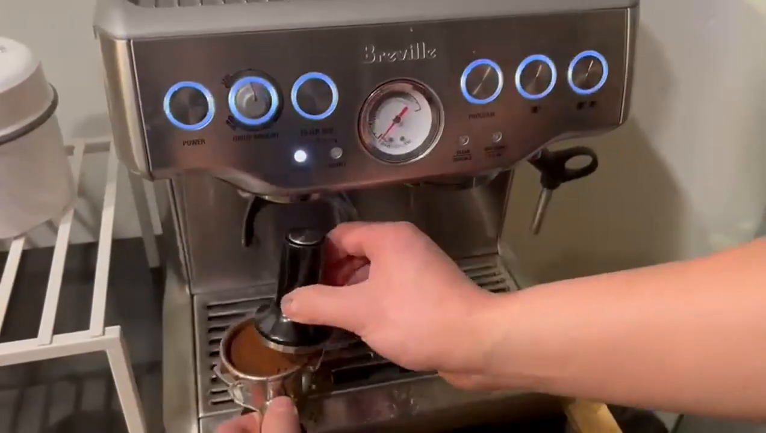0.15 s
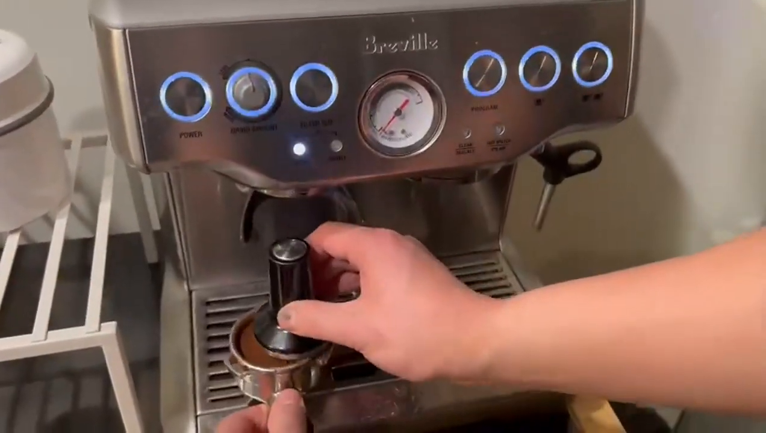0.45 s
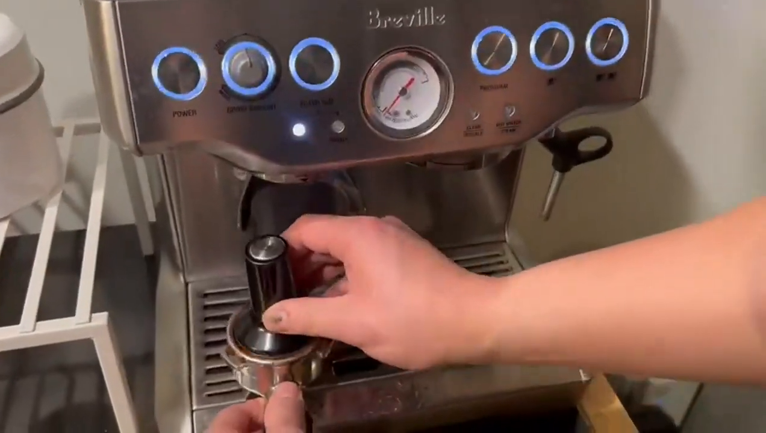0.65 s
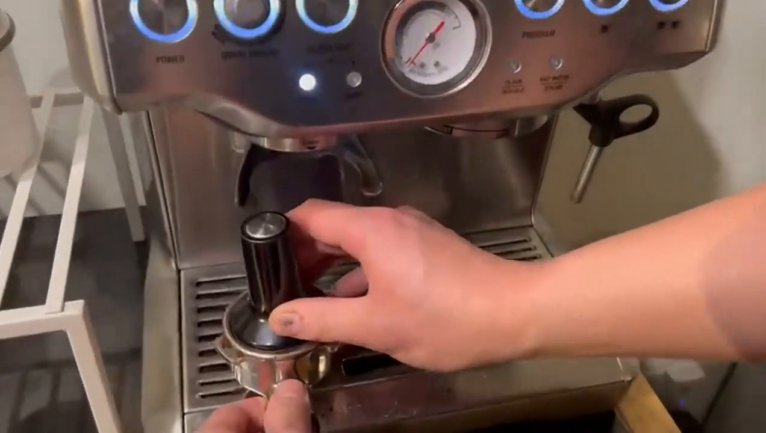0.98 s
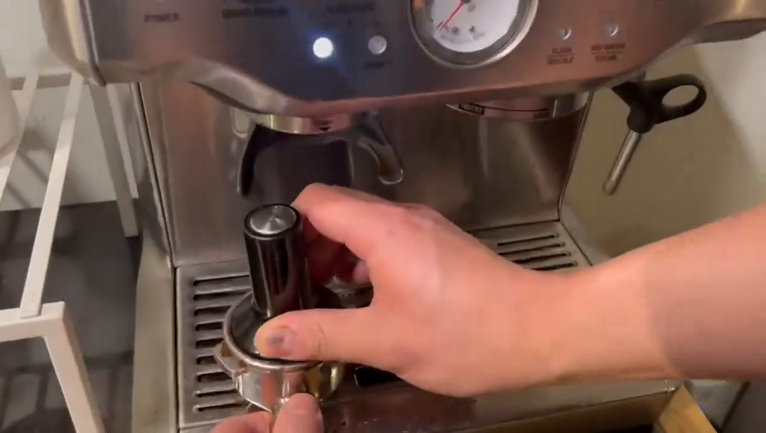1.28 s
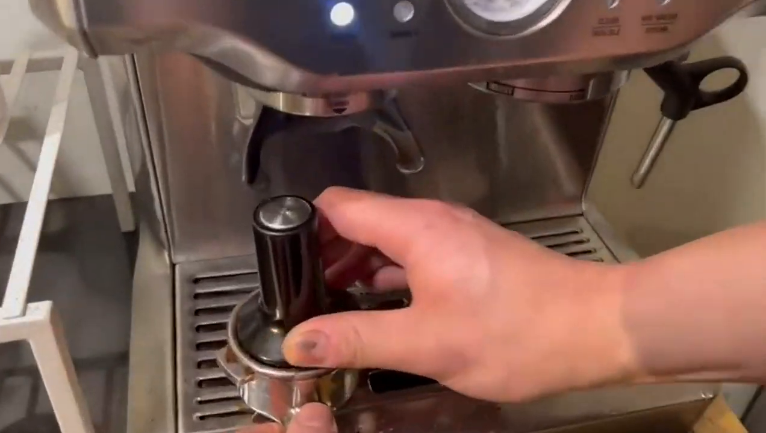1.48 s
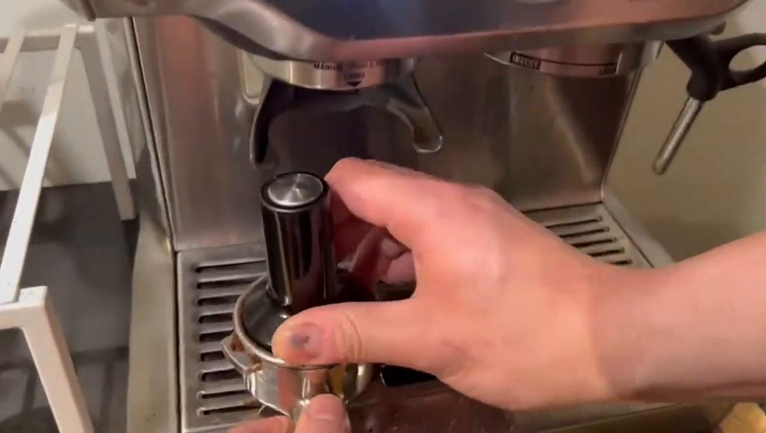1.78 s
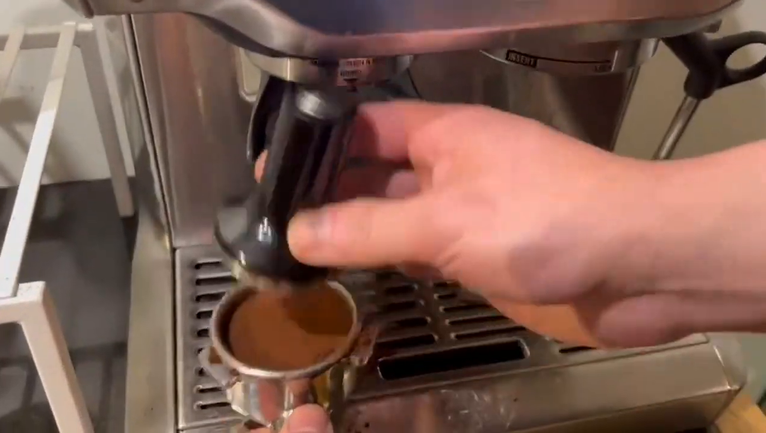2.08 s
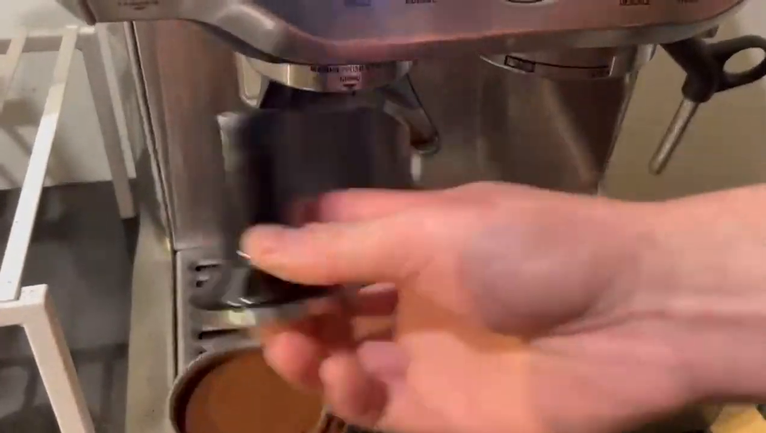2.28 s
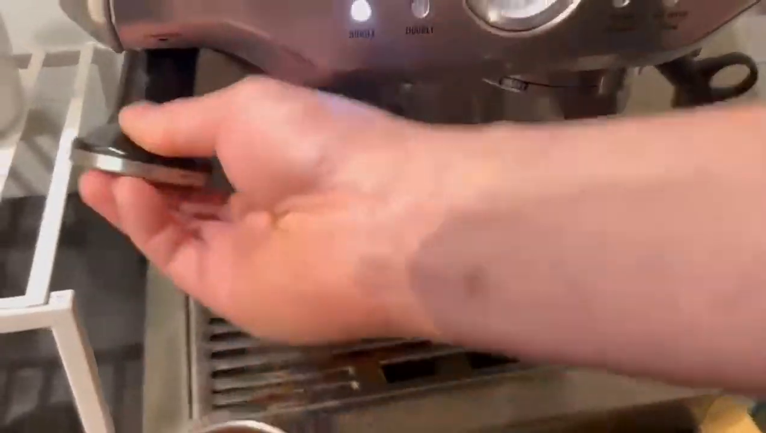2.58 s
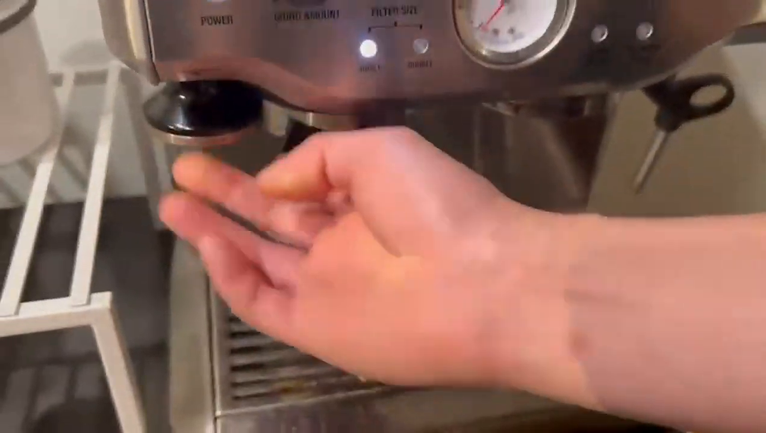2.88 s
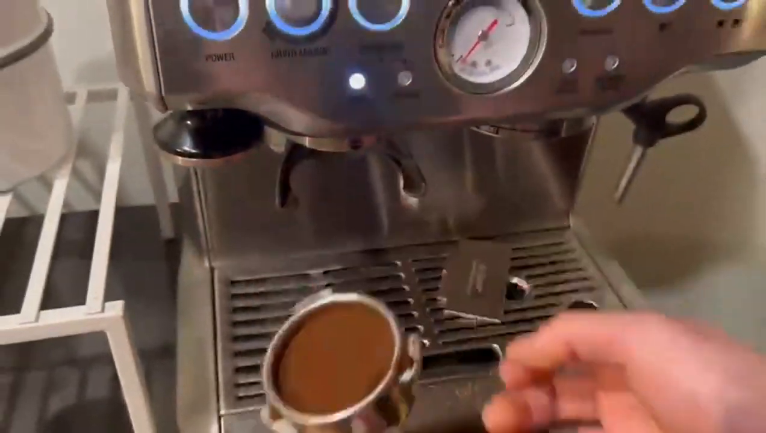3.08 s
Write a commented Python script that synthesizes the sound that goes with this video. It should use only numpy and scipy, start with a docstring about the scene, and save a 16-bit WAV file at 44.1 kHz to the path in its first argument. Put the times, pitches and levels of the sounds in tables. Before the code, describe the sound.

Metal tamper on a coffee machine: one clear early tap, soft clicks and gritty rubbing, a sharp panel knock, then a cluster of loud clacks as it seats in the housing; close up, quiet kitchen.

```python
"""A metal tamper is tapped, pressed and twisted in a coffee filter handle on a drip tray, lifted against
the machine's front panel, then slid into its holder in the housing, where it rattles and snaps home.
Each contact is a short noisy force that rings clear modes and dense sheet-metal modes; rubbing is gritty
noise on level curves, and thumps through the counter are damped swings. The kitchen behind has a low hum
and faint air noise. All is picked up from close by with two microphone ports."""
import sys
import numpy as np
from scipy import signal
from scipy.fft import rfft, irfft
from scipy.io import wavfile
from scipy.ndimage import uniform_filter1d

SR = 44100
rng = np.random.default_rng(int(sys.argv[2]) if len(sys.argv) > 2 else 0)


def store_pcm(level_fs):
    """Save levels as 16-bit WAV."""
    pcm = np.round(np.clip(level_fs, -1, 1) * 32767).astype(np.int16)
    wavfile.write(sys.argv[1], SR, np.atleast_2d(pcm).T)


N = 143325  # samples

STRIKE_DB = 5  # sharp blow at the head of a tap or knock, over its chatter

# Tamper on basket and tray: start_s, level_db (see contacts), then five band levels above it:
# bass_db, low_db, mid_db, high_db, treble_db; left_minus_right_db, build_up_s, contact_fade_s
# (before each band's share), ring_share (of the decay times), clear_modes_db
TAP_CONTACTS = [(0.027, -46, -28, -44, -12.5, -17.5, -17, 1, 0.00034, 0.012, 0.51, 2),
                (0.282, -61.5, -36, 7, 0, -19, -23, -5, 0.002, 0.015, 0.5, -10),
                (0.31, -24, -22, -9.5, -16, -17.5, -20.5, -1.5, 0.0012, 0.011, 0.91, 1),
                (0.494, -40, -10.5, 0, -9.5, -23.5, -22, -3, 0.0009, 0.0015, 0.63, 3),
                (0.515, -50.5, -30, -1, -11, -35, -20, -8, 0.00065, 0.002, 0.41, 18),
                (0.776, -49, 2.5, -6, -33, -53, -46, -2, 0.0018, 0.0017, 0.67, 12),
                (0.849, -69, -6, -15, 0, -23, -37, -6, 0.0004, 0.006, 0.4, 6),
                (1.0, -29.5, -12, -24, -21, -19.5, -10.5, -1.5, 0.00042, 0.0074, 0.43, 0),
                (1.012, -33, -33, -6, -14, -15, -8.5, 0, 0.0019, 0.0044, 0.49, 7),
                (1.996, -61.5, 9, -5, 9, 7.5, -24, -5, 0.00036, 0.0026, 0.31, 4),
                (2.074, -34, -10, -46, -6, -17, -58, -0.5, 0.00019, 0.0027, 1, -2.5),
                (2.309, -48, -22, -4, 3, -12, -26, 3, 0.00051, 0.012, 0.85, -6)]
# Clear modes of the tray: pitch_hz, level_db, t60_s
TRAY_MODES = [(173, -6.5, 0.13), (274, 0.5, 0.024), (329, -5.5, 0.044), (466, 5.5, 0.081),
              (560.5, 3.5, 0.047), (1120, -7.5, 0.09), (1428, -2, 0.034), (2000, -27, 0.048),
              (2475, -9, 0.071), (2830, -25, .12), (2840, -20, 0.076), (3635, -7.5, 0.027),
              (7400, -8, 0.05), (7800, -8, 0.11), (8020, -10, 0.06), (7700, -9, 0.069)]


def taps():
    """Impact excitation: a sharp blow with chatter sets the tray's modes ringing."""
    return contacts(TAP_CONTACTS, TRAY_MODES, undb(STRIKE_DB))


# Lifted tamper on the front panel: columns of TAP_CONTACTS
PANEL_CONTACTS = [(2.181, -7, -19.5, -11, -17, -14.5, -21.5, -2.7, 0.00062, 0.0014, 0.6, 3.2)]
# Clear modes of the front panel: pitch_hz, level_db, t60_s
PANEL_MODES = [(287, -4.5, 0.13), (375, -12.5, 0.33), (482, -12, 0.16), (556, -1.5, 0.11),
               (606, 4.5, 0.081), (720, -23, 0.055), (1060, -8, 0.066), (1192, 2, 0.031),
               (1350, -14, 0.057), (1940, -8, .06), (2320, -3, 0.051), (2460, 2.5, 0.04),
               (2790, -16, 0.036), (3530, -25.5, .06)]


def panel_knock():
    """Plate resonance: the same kind of blow rings the panel's own set of modes."""
    return contacts(PANEL_CONTACTS, PANEL_MODES, undb(STRIKE_DB))


# Tamper in its holder: columns of TAP_CONTACTS
HOLDER_CONTACTS = [(2.457, -17, -12, -4, -8.5, -15.5, -17.5, -1.5, 0.0014, 0.0028, 0.88, -9),
                   (2.468, -27, -36, -10, -1.5, -13, -20, -1.3, 0.00082, 0.022, 1, -2.4),
                   (2.502, -20, -9.5, -4, 2, -16.5, -14.5, 0.24, 0.00084, 0.0017, 1, -1.5),
                   (2.553, -4.5, -29.5, -15.5, -11, -37, -21, 1.6, 0.00042, 0.0037, 0.43, -10),
                   (2.555, -19.5, -32, -4, 2.5, -33, -15.5, -0.77, 0.00085, 0.0044, 0.15, 3.5),
                   (2.729, -41, -4, -27, -1, -20.5, -27.5, 0.0, 0.0033, 0.0017, 0.89, 6),
                   (2.771, -2, -23, -9.5, -9, -16, -19.5, 0.35, 0.0023, 0.0037, 0.58, 3.5),
                   (2.81, -34, -12.5, -9, -9.5, -5.5, -29, 0, 0.0007, 0.002, 0.4, -1),
                   (2.987, -42.5, -37.5, -14, -12, -7, -46, 0.32, 0.00059, 0.014, 1, 4),
                   (3.081, -46, -10.5, -1.5, -1, -24, -41, 0.5, 0.00057, 0.0028, 0.86, 2),
                   (3.122, -32.5, -21.5, -13, -12, -21, -53.5, -0.0093, 0.0054, 0.0039, 1, -2.5)]
# Clear modes of the housing: pitch_hz, level_db, t60_s
HOUSING_MODES = [(276.5, 3, 0.17), (373, -5, 0.15), (484, -9, 0.098), (603, -6.5, 0.22), (788, -5.5, 0.19),
                 (853, 8, 0.025), (921, 2.5, 0.062), (1061, -9.5, 0.078), (1282, -8, 0.17),
                 (1379, -6.5, 0.18), (1600, -10, 0.099), (2414, 0, 0.046), (2670, 0, 0.04),
                 (3370, -8, 0.033), (3760, 1, 0.035)]


def holder_knocks():
    """Repeated impact: a series of blows, each ringing the housing's modes afresh."""
    return contacts(HOLDER_CONTACTS, HOUSING_MODES, undb(STRIKE_DB))


# Short scuffs of metal on metal, the last two in the holder: columns of TAP_CONTACTS
SCUFF_CONTACTS = [(0.684, -41.5, -14.5, -5.5, -15.5, -22.5, -34, -0.5, 0.0053, 0.018, 0.54, 2),
                  (0.697, -43, -14, -1.5, -8.5, -18.5, -35, -1, 0.0012, 0.0091, 0.31, 10),
                  (0.71, -54, -18, -22, -22, -15, -23, -2, 0.00091, 0.011, 0.46, -9),
                  (1.62, -42, -13, -28, -6.5, -9, -49, 0.5, 0.0021, 0.013, 0.51, -5.5),
                  (1.637, -32.5, -17.5, -13.5, -17, -26.5, -51, -2, 0.0011, 0.022, 0.38, 5.5),
                  (1.715, -29.5, -20.5, -11.5, -15.5, -22, -34, -0.5, 0.00043, 0.023, 0.37, 2),
                  (1.893, -40.5, -14, -15.5, -14.5, -9, -14, -4, 0.005, 0.019, 0.14, -8),
                  (1.961, -41.5, -11.5, -18.5, -7.5, -23, -39, 4, 0.00074, 0.032, 0.32, 3),
                  (2.533, -11.5, -18.5, -26, -13.5, -17.5, -28, -0.5, 0.0024, 0.01, 0.27, -1),
                  (2.674, -28, -42, -12.5, -11.5, -14, -18, 0, 0.0013, 0.01, 0.28, -8)]


def scuffs():
    """Frictional excitation: chatter without a sharp blow rings tray or housing."""
    return contacts(SCUFF_CONTACTS[:-2], TRAY_MODES) + contacts(SCUFF_CONTACTS[-2:], HOUSING_MODES)


# Sliding contacts, the first on the basket, the rest in the holder: columns of TAP_CONTACTS
SLIDE_CONTACTS = [(1, -40.5, -7.5, -1.5, -8.5, -17, -24, 0.013, 0.01, 0.0028, 0.82, -5),
                  (2.549, -18.5, -8.5, -5.5, -7.5, -6.5, -9.5, 0.0055, 0.0028, 0.00095, 0.56, -4),
                  (2.75, -35.5, -21, -13, 7, -0.5, -38.5, 0.0012, .001, 0.019, 1, -2.5),
                  (2.767, -20, -8, -11.5, 1, -23, -13, 0.003, 0.0036, 0.00075, 0.41, -6)]


def slides():
    """Frictional excitation: chatter builds up to each contact, quickly or slowly, then fades."""
    return contacts(SLIDE_CONTACTS[:1], TRAY_MODES) + contacts(SLIDE_CONTACTS[1:], HOUSING_MODES)


# Frequency bands of the contacts and the room: low_edge_hz, high_edge_hz
BANDS_HZ = [(130, 330), (330, 800), (800, 2000), (2000, 5000), (5000, 11500)]
# Many small modes of sheet metal, one row per band: level_db, t60_s (before ring_share),
# fade_share (of contact_fade_s), likeness_left_right (0 to 1)
SHEET_MODES = [(0, 0.54, 1.78, 1), (0, 0.27, 1.23, 0.8), (3, 0.12, 1.47, 0.49), (6, 0.042, 1.75, 0.8),
               (6, 0.017, 1.02, 0.77)]
CHATTER_DB, SCATTER_DB, PITCH_SCATTER = 2, 2, 0.006  # grain unevenness; mode level and relative pitch spread


def contacts(rows, modes, strike=0):
    """Modal synthesis: each force, building up and fading, drives clear modes and a diffuse sheet ring."""
    out, lead = np.zeros((2, N)), SR // 25
    t = np.arange(SR // 4) / SR
    from_contact = t - lead / SR
    mode_hz, mode_db, mode_t60 = np.array(modes).T[:, :, None]
    for start, level_db, *bands_db, pan_db, rise, fade, ring_share, clear_db in rows:
        grit = gritty(len(t), CHATTER_DB)
        pitch_chance, level_chance = rng.standard_normal((2, len(mode_hz), 1))
        swing = np.sin(2 * np.pi * mode_hz * (1 + PITCH_SCATTER * pitch_chance) * t)
        swing = swing * 1000. ** (-t / (ring_share * mode_t60))
        ring = np.sum(undb(clear_db + mode_db + SCATTER_DB * level_chance) * swing, axis=0)
        sound = 0
        for band_db, edges, (sheet_db, sheet_t60, fade_share, alike) in zip(bands_db, BANDS_HZ, SHEET_MODES):
            exponent = np.where(from_contact < 0, from_contact / rise, -from_contact / (fade_share * fade))
            force = grit * np.exp(exponent)
            force[lead] = strike * np.sqrt(np.sum(force ** 2))
            sheet_ring = linger(force ** 2, ring_share * sheet_t60)
            sheet = undb(sheet_db) * pair(len(t), alike) * sheet_ring
            clear = signal.fftconvolve(force, ring)[:len(t)]
            part = band(clear + sheet, *edges)
            # each band is set by the power of its loudest 10 ms
            loudest = uniform_filter1d(np.mean(part ** 2, axis=0), SR // 100).max()
            sound = sound + part * undb(level_db + band_db) / np.sqrt(loudest)
        pan = undb(np.array([[pan_db], [-pan_db]]) / 2)
        add(out, sound * pan, int(start * SR) - lead)
    return out


# Metal and grounds rubbing, level curves before flicker: time_s, low_db, high_db, treble_db
RUB_LEVELS = [(0.0, -65, -75, -92), (0.29, -69.5, -66.5, -79), (0.42, -81, -68, -72.5),
              (0.57, -68, -68.5, -76), (0.74, -65.5, -71.5, -84), (0.95, -76, -72.5, -83),
              (1.15, -73, -75.5, -76), (1.32, -81, -76, -70.5), (1.39, -79, -70.5, -92),
              (1.47, -68, -77, -75.5), (1.58, -82.5, -72, -77.5), (1.67, -53.5, -69, -60.5),
              (1.79, -59.5, -55, -59), (1.85, -58, -64.5, -65.5), (1.99, -63.5, -54.5, -58),
              (2.16, -61.5, -51, -58), (2.51, -61, -51, -58.5), (2.64, -66, -58, -55),
              (2.7, -75, -46.5, -51), (2.76, -32.5, -39, -48.5), (2.89, -43, -50, -55.5),
              (3.14, -93, -56.5, -70.5), (3.25, -73, -64, -73.5)]
# Relative spectrum of the rubbing: frequency_hz, density_db (per Hz)
RUB_SPECTRUM = [(88, -13), (150, -6), (337, 11), (679, -0.5), (756, -0.5), (2610, -18.5), (5970, -27),
                (9880, -47), (11000, -50), (14300, -78.5), (22000, -120)]
# Stereo width of the rubbing: frequency_hz, side_minus_mid_db
RUB_WIDTH = [(60, -37), (110, -30), (190, -27), (350, -3), (630, 2.5), (1140, 3.5), (2050, 6.5), (3680, -3),
             (6640, 2), (12000, 20)]
SPLIT_HZ, GRIT_DB = (1500, 5000), 3  # crossovers of the three parts; grain unevenness
FLICKER_DB = (2.2, 1.6, 2)  # low, high, treble


def rub():
    """Friction noise: dense uneven grains, whose low, high and treble parts flicker independently."""
    time, *curves_db = np.array(RUB_LEVELS).T
    t = np.arange(N) / SR
    mid = colour(gritty(N, GRIT_DB), RUB_SPECTRUM)
    side = colour(colour(gritty(N, GRIT_DB), RUB_SPECTRUM), RUB_WIDTH)
    noise = mid + side * np.array([[1], [-1]])
    low, below_treble = (signal.sosfiltfilt(signal.butter(1, hz, fs=SR, output="sos"), noise)
                         for hz in SPLIT_HZ)
    parts = (low, below_treble - low, noise - below_treble)
    out = np.zeros((2, N))
    for part, curve_db, flicker_db in zip(parts, curves_db, FLICKER_DB):
        level_db = np.interp(t, time, curve_db) + flicker_db * walk(30)
        out += unit(part) * undb(level_db)
    return out


# Low thumps through the counter: start_s, level_db (of the swing before rise and decay), pitch_hz, t60_s
COUNTER_THUMPS = [(0.287, -30, 60, 0.17), (0.861, -46.5, 55, 0.81), (1.041, -40, 94, 0.16),
                  (2.184, -45, 146.3, 0.25), (2.462, -37, 45, 0.12), (2.559, -37, 44.4, .1),
                  (2.776, -35.5, 127, .15)]
THUMP_RISE_S = 0.0059


def thumps():
    """Damped oscillation: each thump is one low sine with a soft rise and exponential decay."""
    out, t = np.zeros((2, N)), np.arange(SR // 2) / SR
    for start, level_db, hz, t60 in COUNTER_THUMPS:
        decay = 1000. ** (-t / t60)
        rise = 1 - np.exp(-t / THUMP_RISE_S)
        swing = np.sin(2 * np.pi * hz * t) * decay * rise
        add(out, np.ones((2, 1)) * undb(level_db) * swing, int(start * SR))
    return out


# Room tail, one row per band: t60_s, level_db, likeness_left_right (0 to 1)
ROOM_BANDS = [(0.28, -10.5, 0.98), (0.26, -14.5, 0.17), (0.33, -8, 0.21), (0.31, -8, 0.1),
              (0.22, -10, 0.092)]


def room(x):
    """Reverberation: convolution with decaying noise, band by band, partly alike left and right."""
    t = np.arange(SR * 3 // 4) / SR
    tail = np.zeros((2, len(t)))
    for edges, (t60, level_db, alike) in zip(BANDS_HZ, ROOM_BANDS):
        noise = unit(band(pair(len(t), alike), *edges))
        tail += noise * 1000. ** (-t / t60) * undb(level_db) / np.sqrt(t60 * SR)
    return signal.fftconvolve(x.mean(axis=0)[None], tail, axes=1)[:, :N]


# Phase between the two ports: frequency_hz, left_lead_rad
PORT_PHASE = [(0, 0), (600, .3), (1400, .9), (2400, .5), (4700, .9), (6500, 1.9), (9000, 1.7), (12000, 1.8)]


def ports(x):
    """Phase difference between receivers: close sounds reach the two ports with a pitch-dependent offset."""
    hz, lead_rad = np.array(PORT_PHASE).T
    turn = np.interp(np.arange(N // 2 + 1) * SR / N, hz, lead_rad) / 2
    return irfft(rfft(x) * np.exp(1j * np.array([turn, -turn])), N)


# Relative spectrum of the air noise: frequency_hz, density_db (per Hz)
AIR_SPECTRUM = [(15, -61.5), (25, -42.5), (41, -7), (64, 2), (87, -6.5), (160, -9.5), (197, -34),
                (247, -12.5), (480, -27), (1710, -62), (11000, -47), (14300, -88), (22000, -120)]
# Stereo width of the air noise: frequency_hz, side_minus_mid_db
AIR_WIDTH = [(60, -22), (110, -21), (190, -20), (350, -12), (630, -33), (1140, -5), (2050, -34.5),
             (3680, -28), (6640, -1), (12000, 5)]
AIR_DB = -65.5  # mid signal, 100 Hz to 12 kHz
HUM_HZ, HUM_WIDTH_HZ, HUM_DB = 59.7, 9.3, -57.5


def kitchen():
    """Filtered noise: air noise wide in the treble, and a hum wavering because its band is narrow."""
    mid = colour(rng.standard_normal(N), AIR_SPECTRUM)
    side = colour(colour(rng.standard_normal(N), AIR_SPECTRUM), AIR_WIDTH)
    hum = unit(band(pair(N, 1.0), HUM_HZ - HUM_WIDTH_HZ / 2, HUM_HZ + HUM_WIDTH_HZ / 2))
    gain = undb(AIR_DB) / np.std(band(mid, 100, 12000))
    air = gain * (mid + side * np.array([[1], [-1]]))
    return air + undb(HUM_DB) * hum


def undb(db):
    """Decibel law: amplitude ratio of a level."""
    return 10 ** (np.asarray(db) / 20)


def unit(x):
    """Normalisation: scales to an RMS of one."""
    return x / np.sqrt(np.mean(x ** 2))


def band(x, lo_hz, hi_hz):
    """Band-pass filtering between two edges."""
    return signal.sosfilt(signal.butter(2, [lo_hz, hi_hz], "bandpass", fs=SR, output="sos"), x)


def colour(x, table):
    """Spectral shaping: weights noise by (Hz, dB) points joined on a log-frequency axis."""
    hz, db = np.array(table).T
    f = np.maximum(np.arange(N // 2 + 1) * SR / N, 1)
    return irfft(rfft(x) * undb(np.interp(np.log(f), np.log(hz), db)), N)


def walk(rate):
    """Slow random modulation: levels held 1 / rate s and slewed, with an RMS near one."""
    hold = int(SR / rate)
    steps = np.repeat(rng.standard_normal(N // hold + 1), hold)
    return unit(uniform_filter1d(steps, hold)[:N])


def gritty(count, grit_db):
    """Granular noise: Gaussian samples of exponentially scattered level."""
    return rng.standard_normal(count) * undb(grit_db * rng.exponential(size=count))


def pair(count, alike):
    """Partial coherence: two noises sharing a mid part in proportion to their likeness."""
    mid, side = rng.standard_normal((2, count))
    alike = np.clip(alike, 0, 1)
    return np.sqrt(1 + alike) * mid + np.sqrt(1 - alike) * side * np.array([[1], [-1]])


def linger(power, t60):
    """Energy storage: amplitude of a diffuse ring fed by the power and dying by 60 dB in t60."""
    keep = 1000. ** (-2 / (t60 * SR))
    return np.sqrt(signal.lfilter([1], [1, -keep], power))


def add(out, x, start):
    """Superposition: sums a sound into the scene, cut at its ends."""
    a, b = max(start, 0), min(start + x.shape[-1], N)
    out[:, a:b] += x[:, a - start:b - start]


def scene():
    """Superposition of direct contacts, rubbing, room tail, thumps and the kitchen."""
    struck = taps() + panel_knock() + holder_knocks() + scuffs() + slides()
    return ports(struck) + rub() + room(struck) + thumps() + kitchen()


MIC_HZ, CEILING, TOP_HZ = 9000, 0.85, 12500  # microphone cutoff, input limit (full scale 1), recorder cutoff


def record(dry):
    """Band limiting and saturation: dull microphone, rounded loudest peaks, steep recorder cutoff."""
    dull = signal.sosfilt(signal.butter(4, MIC_HZ, fs=SR, output="sos"), dry)
    rounded = CEILING * np.tanh(dull / CEILING)
    return signal.sosfilt(signal.ellip(8, .2, 70, TOP_HZ, fs=SR, output="sos"), rounded)


dry = scene()
out = record(dry)
store_pcm(out)
```